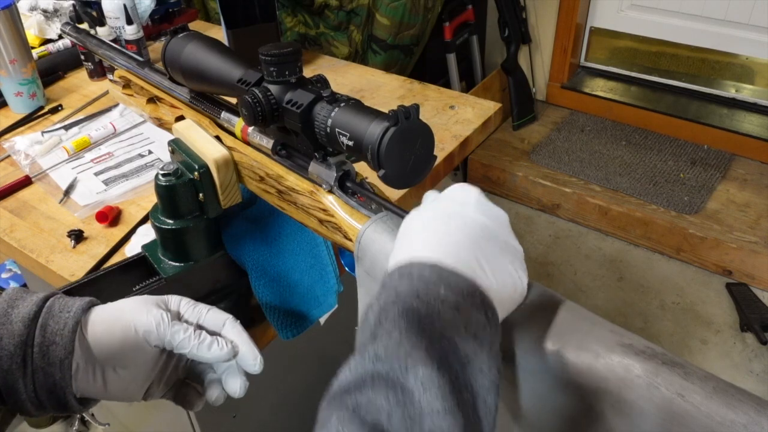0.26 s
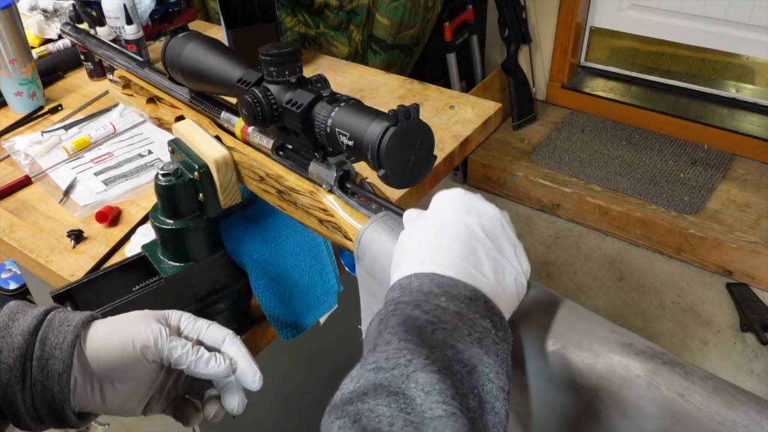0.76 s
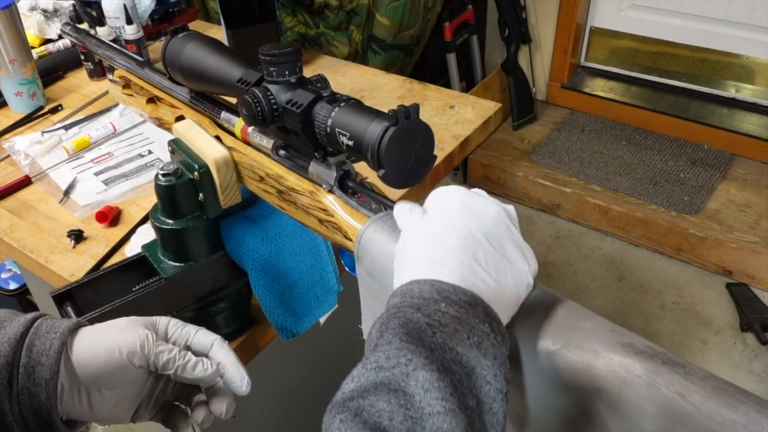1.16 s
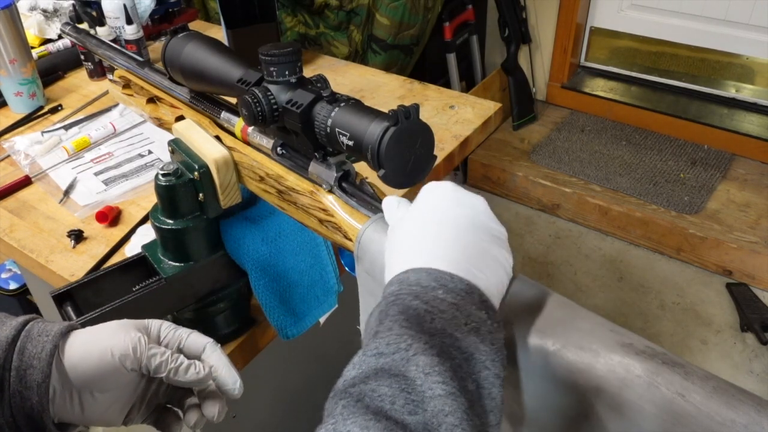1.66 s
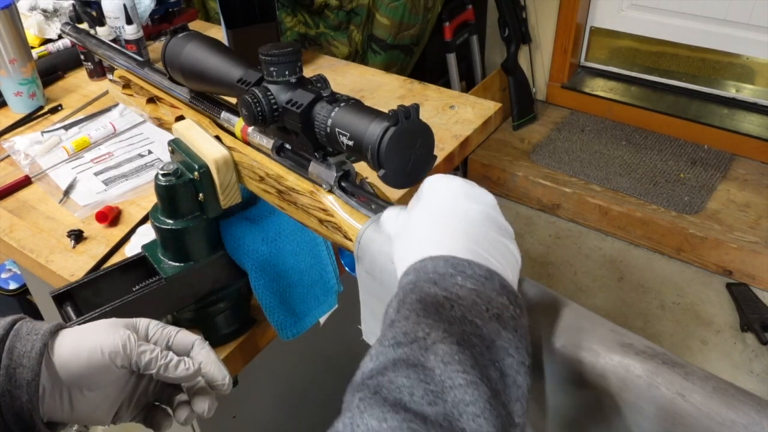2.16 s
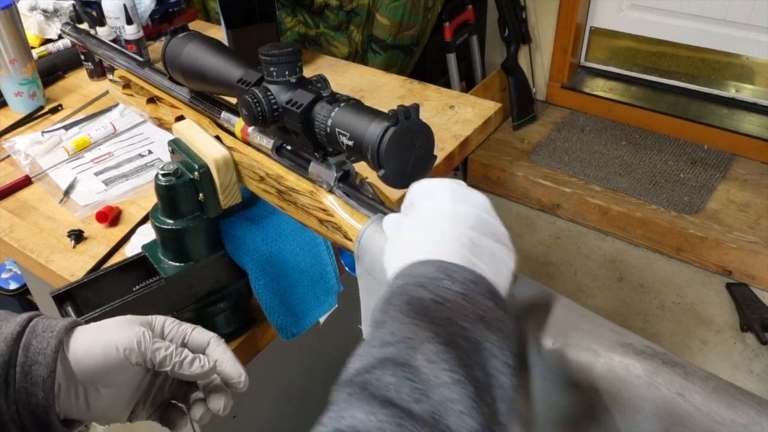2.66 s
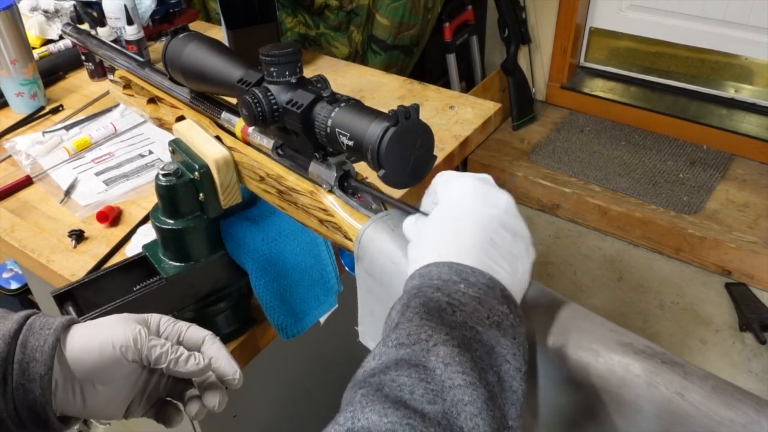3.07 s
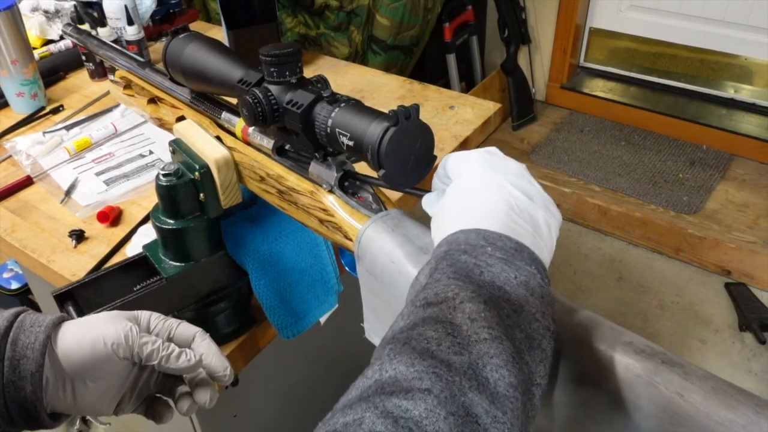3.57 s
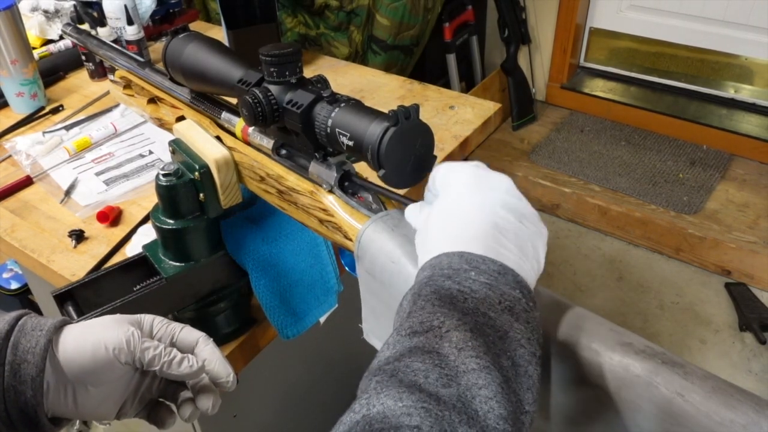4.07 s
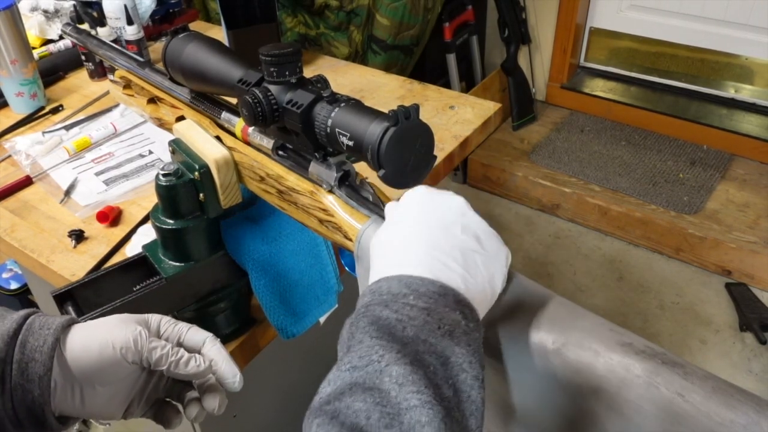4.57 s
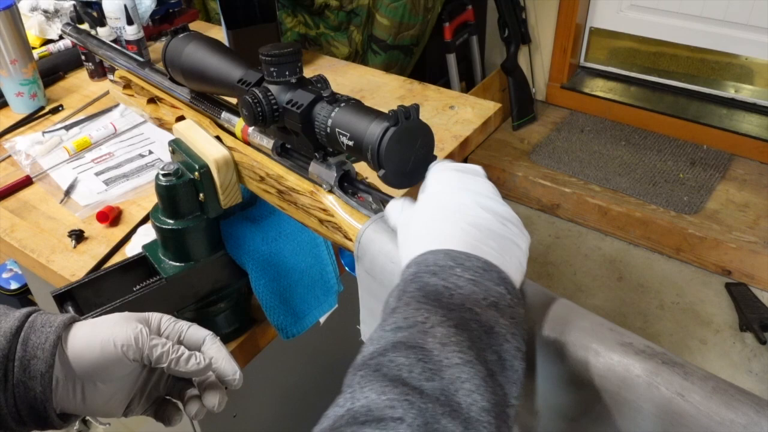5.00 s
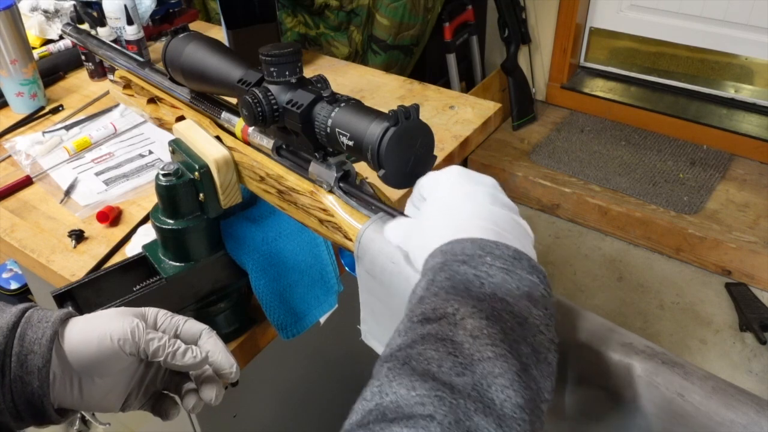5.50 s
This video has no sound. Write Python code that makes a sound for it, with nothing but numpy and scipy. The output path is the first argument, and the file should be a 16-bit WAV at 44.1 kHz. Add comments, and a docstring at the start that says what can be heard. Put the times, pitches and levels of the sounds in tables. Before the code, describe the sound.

A cleaning rod turns inside a rifle action, close to the microphones and slightly to the right, in a workshop with little echo. A low fan-like rumble, hum and rushing air run throughout and slowly grow. A cloth patch rubs the steel in short, soft, uneven hissing strokes. Faint ticks come at the start, with light clicks at 1.5 and 1.7 seconds. From 2.2 to 2.8 seconds comes the loudest cluster of sharp metallic clicks, with a thin high ring at 2.5 and tiny soft knocks from the vice. Scraping continues with smaller ticks and a clear click at 3.5 seconds. Several more ticks around 4.1 lead to a strong, briefly ringing click at 4.4. After more rubbing, a last group of clicks and a small knock falls between 5.4 and 5.7 seconds.

```python
"""A cleaning rod, twisted by a gloved hand, ticks inside a rifle action clamped on a workshop bench.
Each tick rings steel and stock; some leave the rod ringing, and a few pushes thud in the vice.
The patch rubs the bore in short hissing strokes. Behind it are a fan-like rumble, hum and rushing air;
the background level slowly rises. Two close microphone ports hear it; the right one faces the work."""
import sys
import numpy as np
from scipy import signal
from scipy.fft import rfft, irfft, next_fast_len
from scipy.io import wavfile

SR = 44100
rng = np.random.default_rng(int(sys.argv[2]) if len(sys.argv) > 2 else 0)


def to_wav(s):
    """Save 16-bit WAV."""
    ch = np.atleast_2d(s).T  # columns
    pcm = np.round(np.clip(ch, -1, 1) * 32767)  # PCM
    wavfile.write(sys.argv[1], SR, pcm.astype(np.int16))


N = 253134
TIME_S = np.arange(N) / SR
FFT_SIZE = 2 * next_fast_len(N // 2 + 1)


def from_db(db):
    """Decibels to gain."""
    return 10 ** (np.asarray(db) / 20)


def unit_rms(x):
    """Scale to rms 1."""
    return x / np.sqrt(np.mean(x ** 2) + 1e-20)


def on_bins(table, column=1):
    """Table column on the FFT bins, interpolated in log frequency."""
    table = np.array(table)
    bin_hz = np.maximum(np.arange(FFT_SIZE // 2 + 1) * SR / FFT_SIZE, 1)
    return np.interp(np.log(bin_hz), np.log(table[:, 0]), table[:, column])


def colour(x, spectrum):
    """Shape flat noise to a spectrum; rms 1."""
    shaped = rfft(x, FFT_SIZE) * from_db(on_bins(spectrum))
    return unit_rms(irfft(shaped, FFT_SIZE)[..., :N])


def resonate(drive, hz, t60_s):
    """One mode: a unit click starts a decaying unit sine."""
    r, w = from_db(-60 / (t60_s * SR)), 2 * np.pi * hz / SR
    return signal.lfilter([0, np.sin(w)], [1, -2 * r * np.cos(w), r * r], drive + 1e-18)


def drift(rate_hz):
    """Random wander: low-passed noise, rms 1."""
    r = np.exp(-2 * np.pi * rate_hz / SR)
    return unit_rms(signal.lfilter([1], [1, -2 * r, r * r], rng.standard_normal(N + SR))[SR:])


# Workshop decay: freq_hz, t60_s
ROOM_DECAY = [(500, .4), (2000, 0.18), (6000, 0.18), (15000, 0.09)]

def room_echoes(x, first_echo_s):
    """Two independent noise tails, dying band by band."""
    t, tail = np.arange(SR // 2) / SR, 0
    freq_hz, t60_s = np.transpose(ROOM_DECAY)
    edges_hz = 300 * 2 ** np.arange(0, 6.1, .75)
    for low, high in zip(edges_hz, edges_hz[1:]):
        band_t60_s = np.interp(np.log(low * high) / 2, np.log(freq_hz), t60_s)
        bandpass = signal.butter(2, [low, high], "band", fs=SR, output="sos")
        band = signal.sosfilt(bandpass, rng.standard_normal((2, len(t))))
        tail += band * from_db(-60 * t / band_t60_s) * (t > first_echo_s)
    return signal.fftconvolve(x[None], unit_rms(tail) / np.sqrt(len(t)), axes=1)[:, :N]


# Rumble swells: time_s, level_db
RUMBLE_LEVEL = [(0.0, -38), (0.13, -36), (0.25, -42.5), (0.59, -36.5), (1.45, -34.5), (1.55, -41.5),
                (1.73, -32), (2.48, -34), (2.7, -35), (3.13, -31), (3.55, -38), (3.64, -29), (3.74, -37),
                (4.24, -29.5), (4.68, -32.5), (4.92, -27), (5.05, -29.5), (5.74, -31.5)]
# Rumble spectrum: freq_hz, density_db
RUMBLE_SPECTRUM = [(8, -43), (14, 11), (24, -9.5), (38, -2), (50, 3), (60, 2), (72, -1), (87, -21),
                   (100, -16), (125, -30.5), (160, -35.5), (220, -56)]
# Airflow spectrum: freq_hz, density_db
AIR_SPECTRUM = [(53, -57), (90, -1), (151, -17.5), (209, -16.5), (264, -24), (434, -30), (599, -31),
                (653, -27), (2770, -37), (4640, -36.5), (9240, -32), (14200, -41), (15500, -68)]
# Duct resonances: pitch_hz, width_hz, initial_level_db
DUCT_MODES = [(203.1, 2.8, -71.5), (305, 14.4, -74.5), (370.3, 13, -77), (596.4, 3, -79.5), (721, 8.7, -83)]

def fan_noise():
    """Fan-like rumble, wavering hum, rushing air and duct resonances; the level slowly rises."""
    hum_hz, hum_waver, hum_db = 56.76, 0.06477, -4.5
    air_db, rise_db_per_s, wander_db = -57.5, 1.7263, 2
    rise_db = rise_db_per_s * TIME_S + wander_db * drift(4.3)
    pitch_hz = hum_hz * (1 + hum_waver * drift(3.18))
    hum = np.sqrt(2) * np.sin(2 * np.pi * np.cumsum(pitch_hz) / SR)
    rumble = from_db(-1) * colour(rng.standard_normal((2, N)), RUMBLE_SPECTRUM)
    swell = from_db(np.interp(TIME_S, *np.transpose(RUMBLE_LEVEL)))
    out = swell * (rumble + from_db(hum_db) * hum)
    out += from_db(air_db + rise_db) * colour(rng.standard_normal((2, N)), AIR_SPECTRUM)
    for hz, width_hz, level_db in DUCT_MODES:
        tone = resonate(rng.standard_normal((2, N)), hz, t60_s=np.log(1000) / np.pi / width_hz)
        out += from_db(level_db + rise_db) * unit_rms(tone)
    return out


def fibre_slips(per_s, spread_db):
    """Two rows of dense slips of uneven size."""
    sizes = from_db(spread_db * np.minimum(rng.exponential(1, (2, N)), 5))
    signs = rng.choice([-1, 1], (2, N))
    return sizes * signs * (rng.random((2, N)) < per_s / SR)


# Coarse slip spectrum: freq_hz, density_db
DRAG_SPECTRUM = [(400, -3.5), (900, -7), (1400, -7), (3000, -0.5), (5000, 6), (8000, -4), (15000, -63)]
# Stock resonances: pitch_hz, gain_db, t60_s
STOCK_RESONANCES = [(1460, -5, 0.0048), (1736, 7.5, 0.0074), (2050, 8, 0.0036), (2290, 9.5, 0.0026),
                    (2720, 5, 0.0087), (3200, 4, 0.0075), (3600, 5.5, 0.0067), (4070, 7, 0.0084),
                    (4500, 1, 0.0065)]

def stock_drag(favoured_hz):
    """Coarse slips wake the stock modes nearest the favoured pitch; rms 1."""
    slips = colour(fibre_slips(per_s=3500, spread_db=2), DRAG_SPECTRUM)
    ringing = 0
    for hz, gain_db, t60_s in STOCK_RESONANCES:
        away = np.minimum(np.abs(np.log2(hz / favoured_hz)) / 0.5, 1)
        ringing += from_db(gain_db - 10 * away) * resonate(slips, hz, 0.9 * t60_s)
    return unit_rms(slips + 0.8 * unit_rms(ringing))


def twist_envelope_db(twists, peaks_db, creep_db, stretch):
    """Each twist swells and fades; the strongest wins, over a floor of creeping cloth."""
    edge_db = 18.5
    t, level_db = np.arange(0, N, 32) / SR, creep_db
    for (peak_s, rise_s, fall_s, *_), peak_db in zip(twists, peaks_db):
        away = np.maximum((peak_s - t) / rise_s, (t - peak_s) / fall_s)
        level_db = np.maximum(level_db, peak_db - edge_db * away / stretch)
    return np.interp(TIME_S, t, level_db)


# Patch twists: peak_s, rise_s, fall_s, hiss_db, drag_db, stock_hz
TWISTS = [(0.16, 0.16, 0.6, -53.5, -61, 2110), (0.43, 0.21, 0.17, -48.5, -60.5, 2100),
          (0.65, 0.045, 0.087, -44.5, -66, 2000), (0.83, 0.086, 0.081, -52.5, -62.5, 2010),
          (0.959, 0.047, 0.2, -49, -62, 2200), (1.21, 0.24, 0.21, -48.5, -60.5, 1990),
          (1.4, 0.052, 0.17, -47, -60.5, 1950), (1.57, 0.094, 0.081, -46, -54.5, 1890),
          (1.8, 0.29, 0.2, -53, -61.5, 2200), (1.97, 0.17, 0.52, -50, -64.5, 2400),
          (2.19, 0.013, 0.36, -52, -65.5, 2510), (2.39, 0.0073, 0.44, -49, -60, 2670),
          (2.454, 0.069, 0.12, -43, -51.5, 2630), (2.508, 0.011, 0.093, -37, -52.5, 4260),
          (2.637, 0.063, 0.069, -40.5, -49.5, 2080), (2.709, 0.021, 0.11, -37.5, -46.5, 1750),
          (2.83, 0.23, 0.11, -47, -55, 1800), (2.99, 0.18, 0.21, -49, -59.5, 1700),
          (3.12, .1, 0.37, -50, -64, 1650), (3.18, 0.092, 0.058, -58, -54, 1650),
          (3.232, 0.021, 0.14, -52, -45, 1800), (3.261, 0.064, 0.086, -41.5, -47, 2900),
          (3.37, 0.026, 0.12, -45, -59.5, 2500), (3.545, 0.016, 0.057, -46.5, -42.5, 2100),
          (3.75, 0.043, 0.19, -52.5, -57, 2310), (3.912, 0.014, 0.088, -43, -61, 3000),
          (4.08, 0.023, 0.22, -41.5, -55, 3380), (4.144, 0.055, 0.074, -39.5, -49, 3300),
          (4.3, 0.082, 0.19, -45, -67, 1500), (4.39, 0.027, 0.28, -41.5, -45.5, 1550),
          (4.54, 0.13, 0.077, -43, -76.5, 1480), (4.7, 0.27, 0.079, -45.5, -54.5, 1730),
          (4.828, 0.033, 0.14, -40, -50, 1740), (4.92, .05, 0.09, -56, -56, 1630),
          (5.029, 0.043, 0.076, -41.5, -65, 2320), (5.241, 0.15, 0.066, -44.5, -51.5, 2970),
          (5.445, 0.028, 0.048, -49, -47, 2670), (5.52, 0.045, 0.14, -45, -57, 2470),
          (5.67, 0.03, 0.14, -42, -54.5, 2500)]
# Cloth on steel: freq_hz, density_db
HISS_SPECTRUM = [(1760, -29.5), (3000, -12.5), (4100, -18), (4430, -15.5), (5890, -10), (6770, -7),
                 (7350, -5), (8510, -2), (9990, -1), (15500, -17), (16000, -28)]

def patch():
    """Cloth hisses and catches on steel and drags through the stock."""
    peak_s, _, _, hiss_db, drag_db, stock_hz = np.transpose(TWISTS)
    hiss_gain = from_db(twist_envelope_db(TWISTS, hiss_db, creep_db=-62, stretch=0.95) + 1.4 * drift(35))
    hiss = colour(fibre_slips(per_s=3000, spread_db=2.6), HISS_SPECTRUM)
    drag = stock_drag(np.interp(TIME_S, peak_s, stock_hz))
    drag_gain = from_db(twist_envelope_db(TWISTS, drag_db, creep_db=-69, stretch=1.35) + 2.55 * drift(38))
    return hiss_gain * hiss + drag_gain * drag


# Pushes on the vice: start_s, level_db, pitch_hz
VICE_PUSHES = [(1.466, -46.5, 1010), (2.444, -42, 890), (2.698, -41.5, 880), (5.493, -37.5, 725)]

def vice_thuds():
    """A soft pulse rings the clamped stock briefly."""
    out = np.zeros(N)
    for start_s, level_db, pitch_hz in VICE_PUSHES:
        push = signal.lfilter(np.hanning(30) / 10, 1, np.arange(N) == int(start_s * SR))
        out += resonate(from_db(level_db) * push, pitch_hz, t60_s=0.013)
    return out


def strike(start_s, modes, level_db, favoured_hz, reach_oct, fall_db, bounce, curve, sharp_db=0):
    """A contact and two rebounds scaled by bounce; modes far from the favoured pitch get less."""
    rebound_s, scatter_db = 0.00053, 2.3
    onsets = (start_s * SR).astype(int)
    luck = rng.standard_normal((len(onsets), len(modes), 2))
    gap_samples = SR * np.maximum(np.round(rebound_s * favoured_hz), 1) / favoured_hz   # whole cycles
    out = np.zeros((2, N))
    for k, (hz, mode_db, t60_s) in enumerate(modes):
        away = np.minimum(np.abs(np.log2(hz / favoured_hz)) / reach_oct, 1) ** curve
        treble_db = sharp_db * np.clip(np.log2(hz / 10800) / 0.25, 0, 1)
        size = from_db(level_db + mode_db - fall_db * away + treble_db + scatter_db * luck[:, k, 0])
        signs = [np.full(len(onsets), (-1) ** k), np.sign(luck[:, k, 1])]   # near port, far port
        clicks = np.zeros((2, N))
        for hit in range(3):
            clicks[:, onsets + np.round(hit * gap_samples).astype(int)] += bounce ** hit * size * signs
        out += resonate(clicks, hz, t60_s)
    return out


def seat_notes(start_s, modes, level_db, pitch_hz, t60_s):
    """One short note per tick, pitched by where the rod bears, signed like the nearest mode."""
    t = np.arange(SR // 40) / SR
    nearest = np.argmin(np.abs(pitch_hz[:, None] - np.array(modes)[:, 0]), axis=1)
    notes = from_db(level_db[:, None] - 60 * t / t60_s) * np.sin(2 * np.pi * pitch_hz[:, None] * t)
    samples = (start_s * SR).astype(int)[:, None] + np.arange(len(t))
    out = np.zeros(N + len(t))
    np.add.at(out, samples, (-1) ** nearest[:, None] * notes)
    return out[:N]


# Rod resonances: pitch_hz, gain_db, t60_s
ROD_RESONANCES = [(1459, 0, .2), (1670, -2, .15), (2120, -8, .15), (2650, -9, .2), (2826, 1, .25),
                  (3130, -9, .15), (3451, -2, .22), (4120, -7, .1), (4515, 0, .3), (4650, -4, .2),
                  (5320, 2, .22), (5610, -3, .2), (6780, -3, .15), (7000, -5, .2), (7390, -6, .14),
                  (7700, -4, .17), (7840, -2, .2), (7935, -1, .2), (8008, 0, .26), (8090, -4, .15),
                  (8167, -1, .24), (8400, -4, .1), (9450, -2, .15), (9700, -2, .25), (9885, 0, .2)]
# Ticks that leave the rod free: start_s, level_db, favoured_hz, reach_oct
FREE_RINGS = [(2.2522, -59, 7700, 0.38), (2.3823, -45, 7530, 0.12), (2.5004, -34.5, 8000, 0.21),
              (2.681, -55, 8200, .2), (2.701, -50, 1700, 0.14), (3.532, -59, 1900, 3.2),
              (4.147, -49.5, 1460, 0.36), (4.383, -40.5, 3600, 1.8), (4.383, -46, 1459, 0.33),
              (4.383, -52, 9750, .2), (3.171, -55, 1670, 0.21), (3.255, -53, 2750, 0.37),
              (2.701, -42, 6950, .2), (5.44, -45, 7900, 0.25), (5.661, -49, 8100, .25)]

def rod_ringing():
    """The free rod rings on, trembling against the bore."""
    start_s, level_db, favoured_hz, reach_oct = np.transpose(FREE_RINGS)
    rattle_db = 4.5 * drift(260)
    ringing = strike(start_s, ROD_RESONANCES, level_db, favoured_hz, reach_oct,
                     fall_db=24, bounce=0, curve=2)
    return from_db(rattle_db) * ringing


# Action resonances: pitch_hz, gain_db, t60_s
STEEL_RESONANCES = [(5180, 0.5, 0.011), (6300, 0, 0.0044), (6750, -2, 0.0026), (7500, -6, 0.0079),
                    (8020, -1, 0.0055), (8800, 4.5, 0.0041), (9800, 2, 0.0037), (9600, -4.5, 0.006),
                    (10290, -1, 0.0045), (11380, 0, 0.0059), (12600, -8.5, 0.005), (13200, -13, 0.003),
                    (14100, -8, 0.0022), (15600, -18, .003)]
# Rod against action: start_s, steel_db, stock_db, stock_hz, steel_hz, sharp_db
CONTACTS = [(0.1405, -40, -58, 2970, 9800, 0), (0.3742, -47, -59.5, 1740, 8100, 20),
            (0.5264, -66, -49.5, 2050, 9240, 0), (0.904, -65, -47, 1900, 8040, 0),
            (1.5, -29, -50, 2720, 11000, -1), (1.573, -51, -51, 2620, 8800, 1),
            (1.583, -54, -52, 1820, 8780, 0), (1.7465, -60, -48.5, 1550, 9000, 0),
            (1.745, -34, -51, 3250, 7700, -5), (2.167, -42.5, -47.5, 1882, 6300, -2),
            (2.2512, -29, -40, 2560, 11800, 0), (2.2512, -30, -53, 2690, 7650, -8),
            (2.383, -22.5, -44.5, 2530, 7720, -16), (2.4457, -26, -46, 2620, 10500, 14),
            (2.501, -13, -42, 2880, 8020, 6), (2.5013, -13.5, -48, 2750, 9320, 0),
            (2.6312, -24, -47, 2600, 10500, 13), (2.681, -18, -51, 3200, 8200, -1),
            (2.701, -20, -34, 1660, 9550, -9), (2.7007, -19, -32, 2120, 8450, -9),
            (2.702, -19.5, -32, 2945, 6600, -3), (2.79, -35, -66, 1780, 9200, 0),
            (2.9322, -41.5, -44, 2984, 6300, 0), (3.171, -57, -55, 1650, 8400, 0),
            (3.275, -33, -61, 2780, 10130, -2), (3.466, -58, -50, 3360, 7550, 0),
            (3.532, -24, -35.5, 1930, 8460, -5), (3.5437, -37, -38, 2940, 8830, 0),
            (3.55, -48, -48, 2185, 5310, 0), (3.739, -45, -43, 1200, 10400, 0),
            (3.7423, -52, -45.5, 2060, 8880, 0), (3.906, -35, -51, 2760, 11600, -3),
            (4.076, -32, -38.5, 1869, 10180, 3), (4.078, -38, -32.5, 4070, 9500, 0),
            (4.139, -37, -48, 3900, 9200, 0), (4.147, -34, -45, 4200, 9000, 0),
            (4.15, -50, -40, 1450, 8900, 0), (4.2006, -54, -42, 1587, 9100, 3),
            (4.378, -27, -38, 2810, 6720, -8), (4.3828, -19, -34.5, 1710, 10060, -17),
            (4.3826, -17, -28.5, 4600, 7100, -8), (4.397, -40, -40, 3000, 9400, -6),
            (4.417, -45, -40, 2900, 9500, 0), (5.1, -49, -49, 1310, 5120, 0),
            (5.117, -48, -37, 3200, 5340, 0), (5.4238, -31, -47, 2670, 6750, -5),
            (5.44, -23, -39.5, 3940, 8020, -18), (5.4403, -24, -51, 2740, 5430, -8),
            (5.546, -52, -51, 2100, 8590, 0), (5.66, -21.5, -43.5, 2830, 11800, 4),
            (5.7143, -35, -43.5, 3300, 8080, 0)]

def rod_ticks():
    """Contacts ring steel, stock and rod, all too small to radiate bass."""
    start_s, steel_db, stock_db, stock_hz, steel_hz, sharp_db = np.transpose(CONTACTS)
    out = strike(start_s, STEEL_RESONANCES, steel_db, steel_hz,
                 reach_oct=0.71, fall_db=11.5, bounce=0.43, curve=0.63, sharp_db=sharp_db)
    out += strike(start_s, STOCK_RESONANCES, stock_db, stock_hz,
                  reach_oct=1.2, fall_db=15, bounce=0.15, curve=1.5)
    out += seat_notes(start_s, STEEL_RESONANCES, steel_db - 2, steel_hz, t60_s=0.007)
    out += seat_notes(start_s, STOCK_RESONANCES, stock_db + 2.5, stock_hz, t60_s=0.013)
    out += rod_ringing()
    out = signal.sosfilt(signal.butter(4, 1250, "high", fs=SR, output="sos"), out)
    out[1] = signal.hilbert(out[1], next_fast_len(N)).imag[:N]   # quarter cycle off toward the far port
    return out


def blend(rows, coherence):
    """Power mix: row 0 at coherence 1, row 1 at 0."""
    return np.sqrt(coherence) * rows[0] + np.sqrt(1 - coherence) * rows[1]


# Left port against right: freq_hz, gain_db, lead_rad, diffuse_coherence
LEFT_PORT = [(49.6, 1, 0, 1), (262, 0.13, 0.34, 0.97), (1200, 0.86, -0.48, 0.8), (2800, -1, -0.7, 0.48),
             (4600, -0.5, -2.5, 0), (7360, -4, -3, 0.14), (9500, -6, -2.5, 0.07), (13200, -3.5, -2, 0.14),
             (16300, 4.5, -2.5, 0.7)]
# Extra left shading of direct sound: freq_hz, gain_db, coherence
DIRECT_SHADE = [(1800, -.5, 1), (5000, -2.5, 0.36), (7350, -0.5, 0.6), (10500, -6.5, 0.36), (14000, -3, .5)]

def microphone_ports(diffuse, direct):
    """The right port hears row 0; the left a shaded, phase-shifted blend of both rows."""
    diffuse, direct = rfft(diffuse, FFT_SIZE), rfft(direct, FFT_SIZE)
    left = blend(diffuse, on_bins(LEFT_PORT, column=3))
    left += from_db(on_bins(DIRECT_SHADE)) * blend(direct, on_bins(DIRECT_SHADE, column=2))
    left *= from_db(on_bins(LEFT_PORT)) * np.exp(1j * on_bins(LEFT_PORT, column=2))
    right = diffuse[0] + direct[0]
    return irfft(np.array([left, right]), FFT_SIZE)[:, :N]


def scene():
    """Rod, its echoes, patch and fan noise at the two ports."""
    knocks = rod_ticks() + vice_thuds()
    echoes = from_db(-11) * room_echoes(knocks[0], first_echo_s=0.003)
    return microphone_ports(diffuse=echoes + patch() + fan_noise(), direct=knocks)


def record(dry):
    """Steep low-pass on the top treble."""
    stopband_hz = 16800
    return signal.sosfilt(signal.cheby2(12, 60, stopband_hz, fs=SR, output="sos"), dry)


dry = scene()
out = record(dry)
to_wav(out)
```